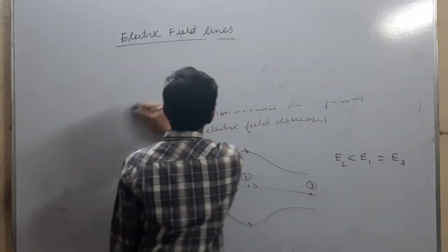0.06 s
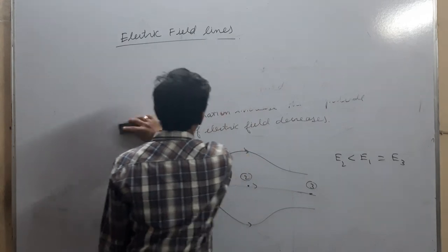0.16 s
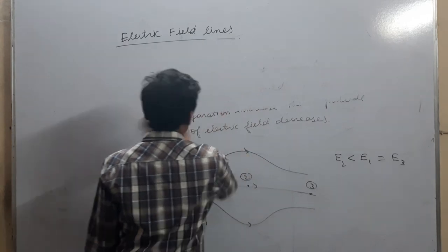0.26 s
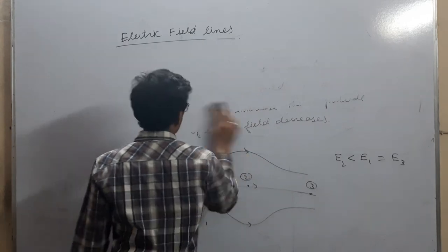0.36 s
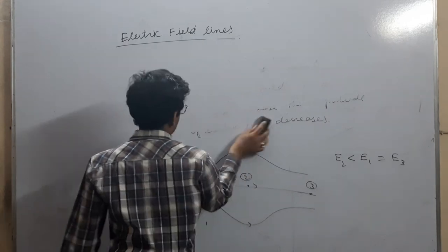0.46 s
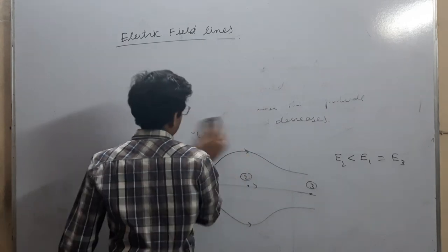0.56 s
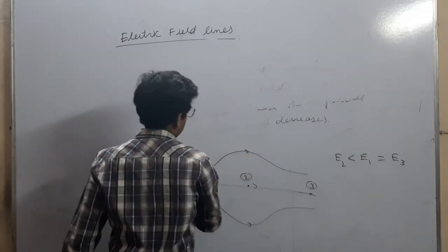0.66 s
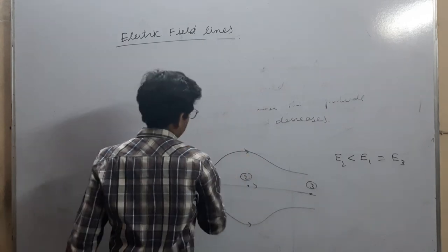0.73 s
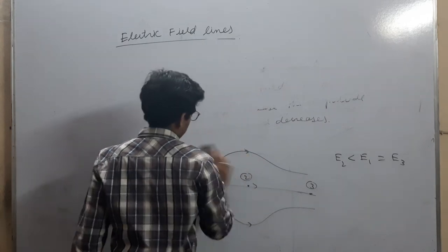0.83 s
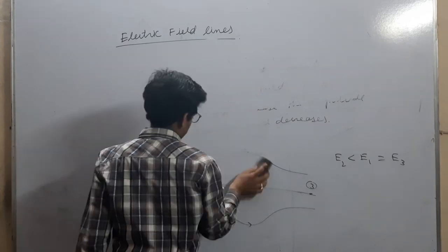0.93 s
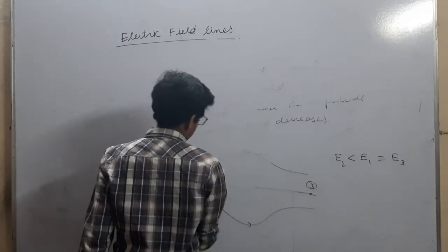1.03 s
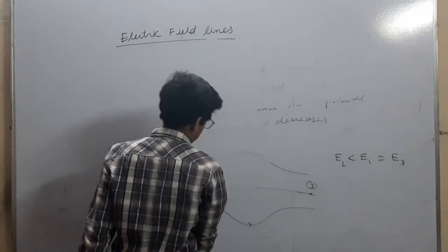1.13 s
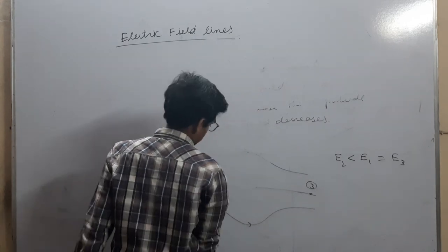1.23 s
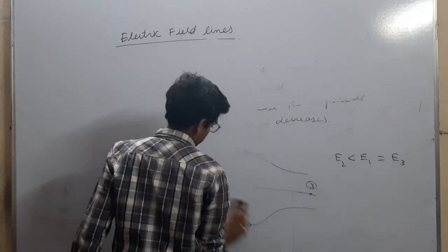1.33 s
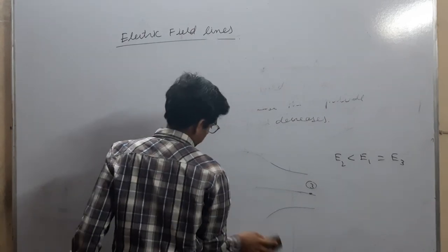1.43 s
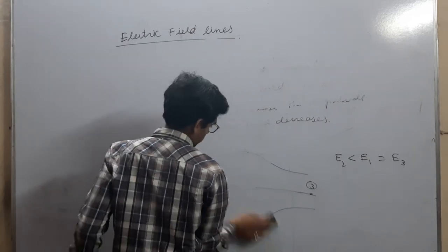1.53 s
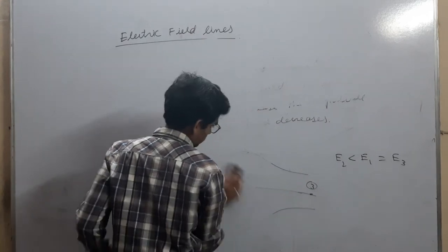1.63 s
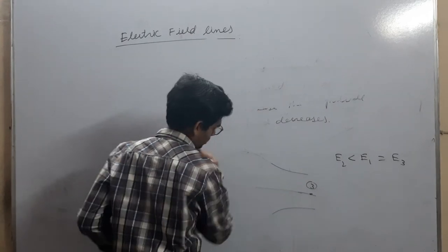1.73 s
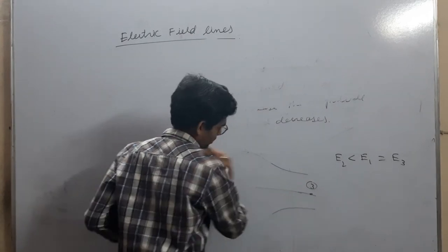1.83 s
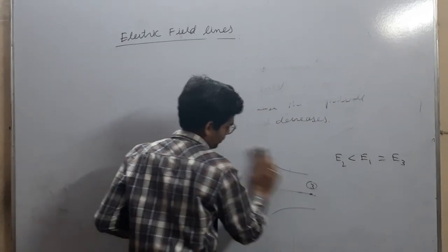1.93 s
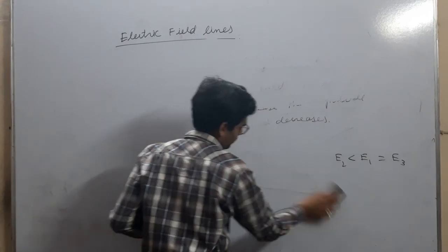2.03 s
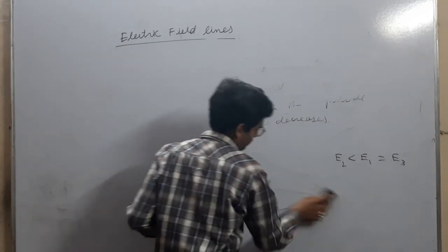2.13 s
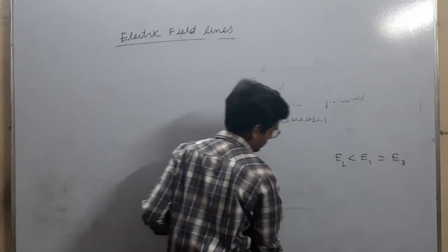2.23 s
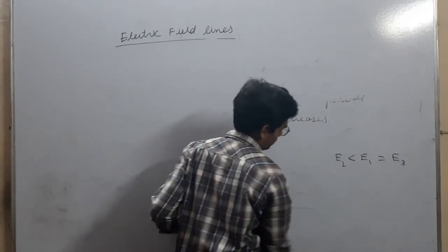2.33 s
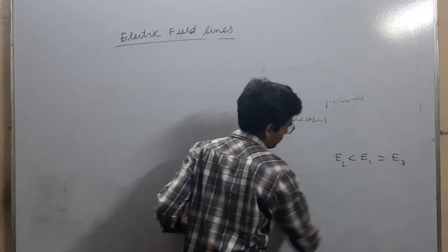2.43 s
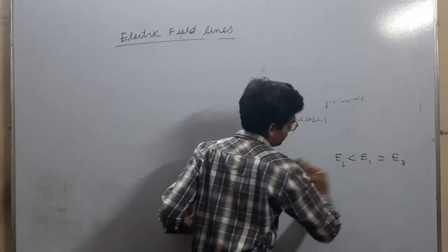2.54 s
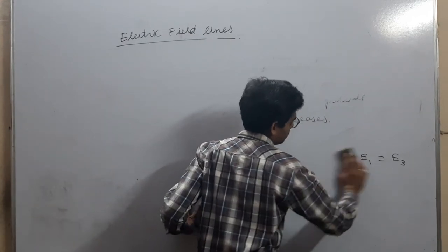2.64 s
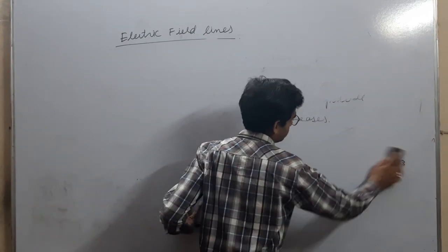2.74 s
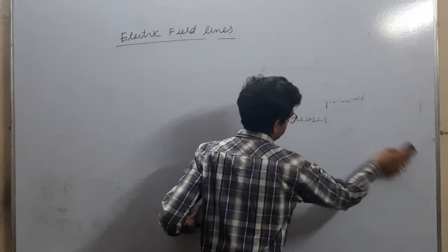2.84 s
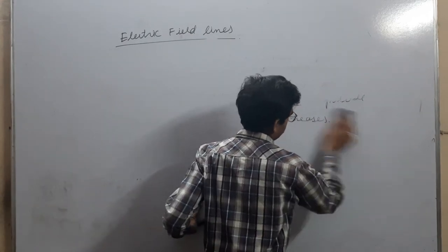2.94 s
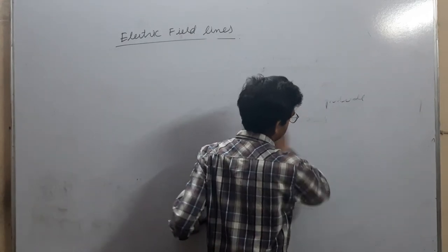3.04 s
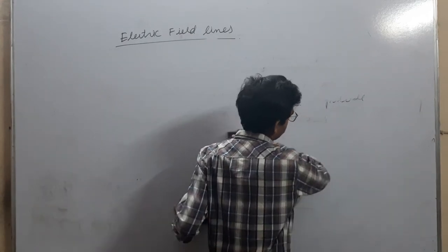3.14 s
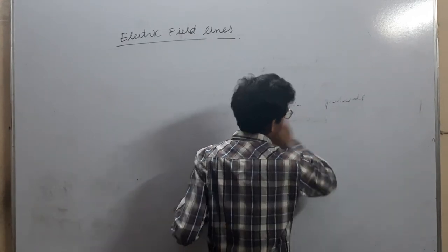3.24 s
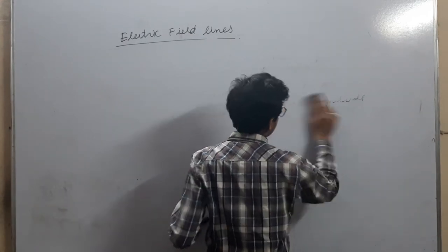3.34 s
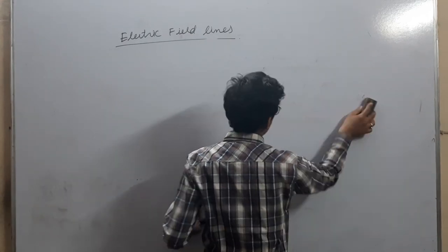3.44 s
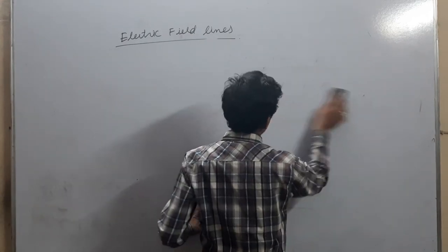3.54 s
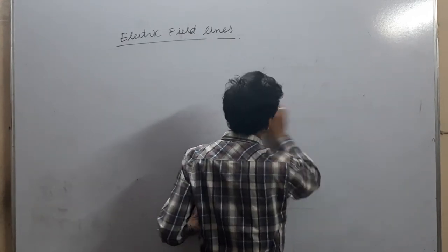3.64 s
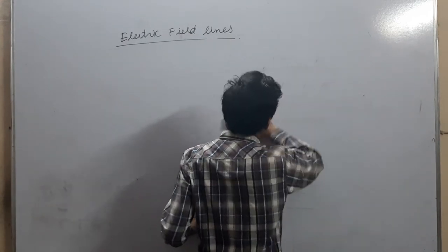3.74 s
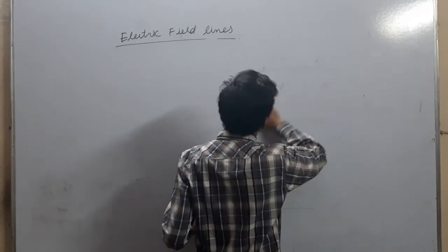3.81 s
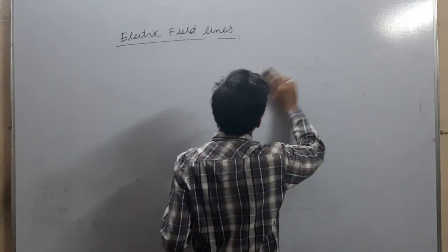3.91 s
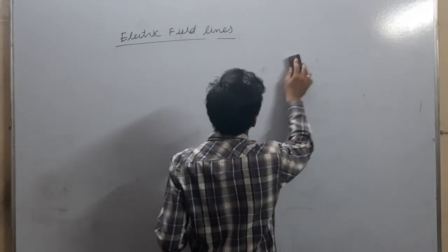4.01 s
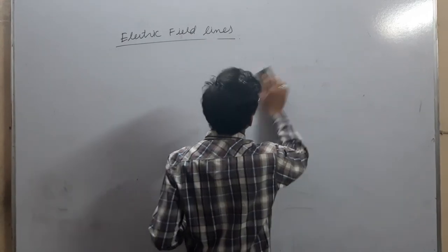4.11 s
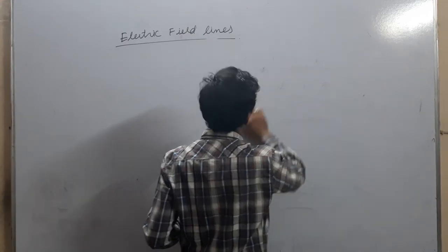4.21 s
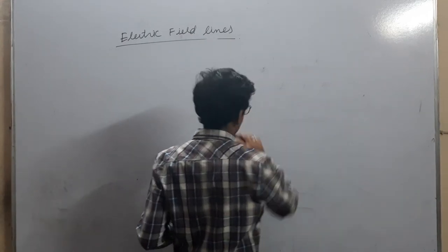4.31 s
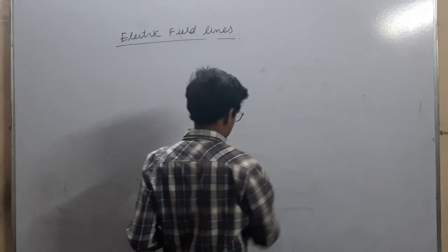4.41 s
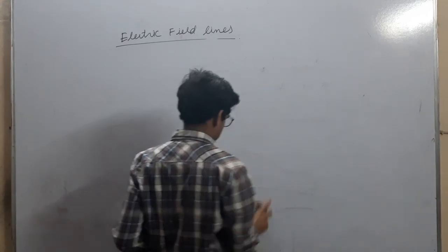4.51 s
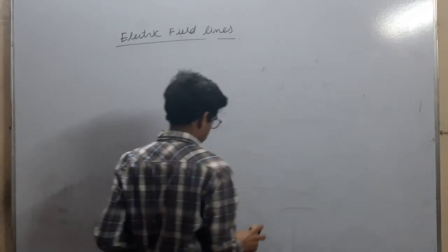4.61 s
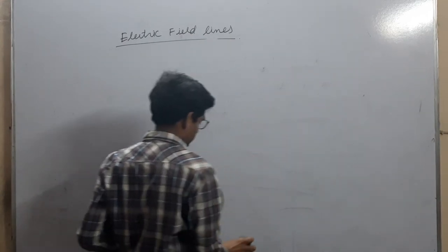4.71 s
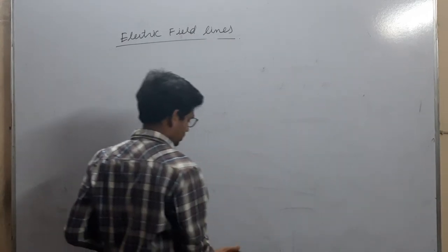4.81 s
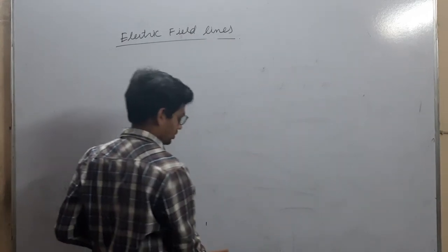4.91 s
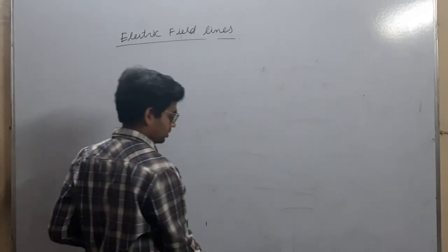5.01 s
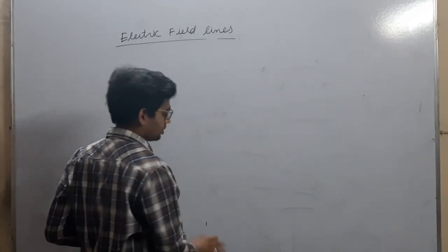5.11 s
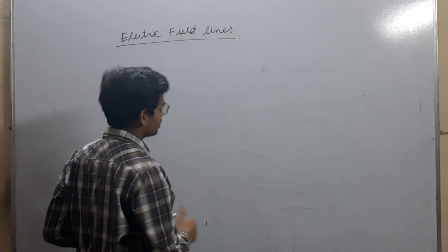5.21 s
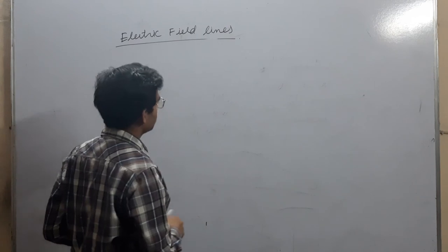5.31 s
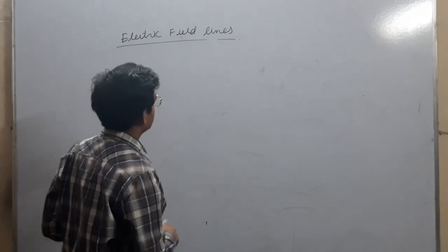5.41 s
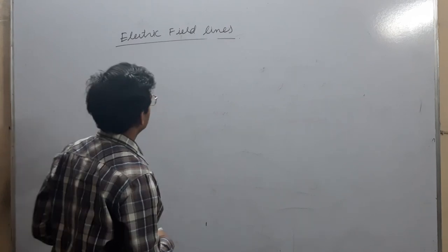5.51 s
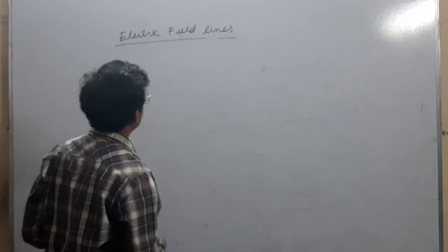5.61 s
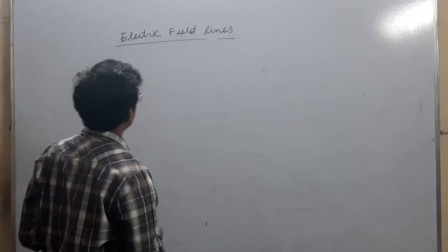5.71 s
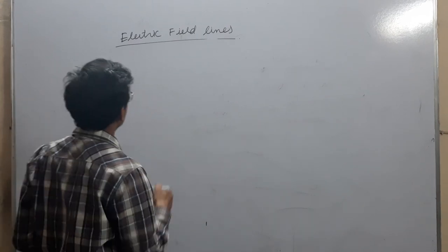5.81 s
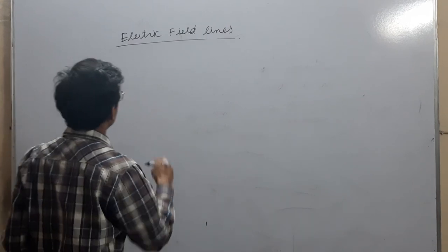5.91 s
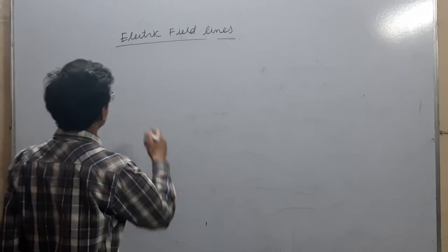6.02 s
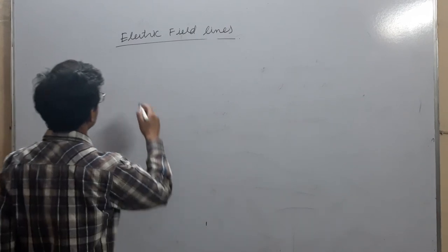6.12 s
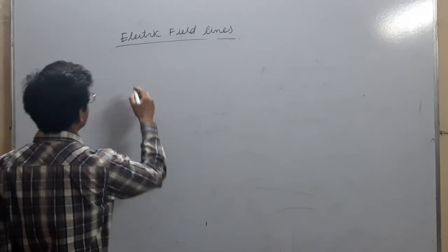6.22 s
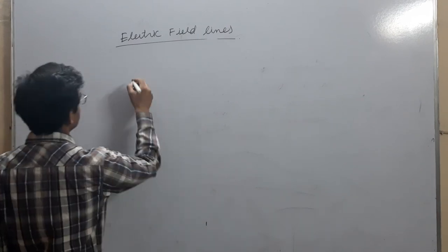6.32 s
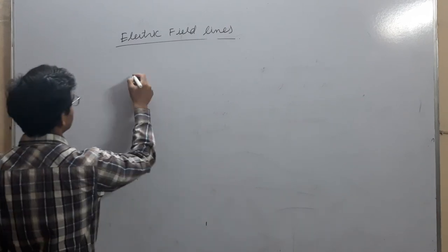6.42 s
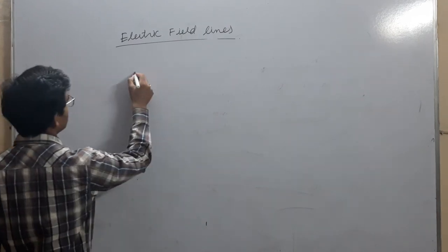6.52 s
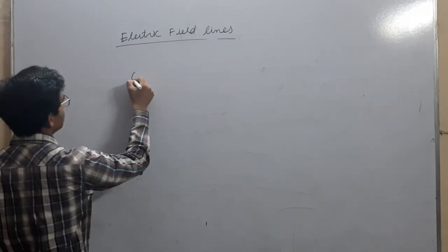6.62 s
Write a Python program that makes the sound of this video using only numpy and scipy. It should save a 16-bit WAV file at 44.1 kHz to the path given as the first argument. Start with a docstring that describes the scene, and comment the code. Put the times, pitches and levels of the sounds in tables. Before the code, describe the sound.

A felt duster swishes across a whiteboard in an echoing classroom, lands with two loud knocks, while an engine putters outside.

```python
"""A felt duster wipes a wall whiteboard in a bare, echoing classroom; the board drums softly under the strokes.
It is put down on the ledge with two loud knocks, a marker is uncapped and starts to write.
Outside, a single-cylinder engine putters along the street and changes gear twice, over a dull wash of traffic.
Shaped noise makes the strokes, blows and street; decaying sines ring the board; summed orders make the engine."""
import sys
import numpy as np
from scipy import signal
from scipy.io import wavfile

SR = 44100
rng = np.random.default_rng(int(sys.argv[2]) if len(sys.argv) > 2 else 0)


def file_out(sig):
    """Save sig as 16-bit WAV at sys.argv[1]."""
    # one column per channel
    cols = np.atleast_2d(sig).T
    # limit, then scale
    lim = np.clip(cols, -1, 1)
    pcm = np.round(lim * 32767).astype(np.int16)
    wavfile.write(sys.argv[1], SR, pcm)


N = 293381
TIME = np.arange(N) / SR

# analysis bands that build every diffuse sound
EDGES = np.geomspace(28, 17000, 34)
CENTRES = np.sqrt(EDGES[1:] * EDGES[:-1])
BANK = [signal.butter(2, pair, "band", fs=SR, output="sos") for pair in zip(EDGES, EDGES[1:])]

# left-right likeness of the room's sound: [f/Hz, correlation]
ROOM_LIKENESS = [(130, 0.77), (220, 0.89), (400, 0.7), (700, 0.31), (1250, -0.26), (2000, 0.1),
                 (4400, 0.0055)]
# spectrum of a hard edge scraping the board: [f/Hz, level per Hz/dB]
SCRAPE_SPECTRUM = [(300, -8), (1000, -9), (1700, -2), (2400, 0), (3900, -3), (5500, -14), (15000, -40)]

# a stroke follows the hand's speed: each layer grows as a power of it, then hangs in the air (t60 in s)
SCRAPE_POWER, SCRAPE_HANG_S = 1.8, 1
DRUM_POWER, DRUM_HANG_S = 0.69, 1


def from_db(db):
    """Level in dB to a gain."""
    return 10 ** (np.asarray(db) / 20)


def rms_one(x):
    """Scales a sound to rms 1."""
    return x / np.sqrt(np.mean(x ** 2) + 1e-20)


def curve(points):
    """Draws a curve of time and value as straight lines, at every sample."""
    times, values = np.transpose(points)
    return np.interp(TIME, times, values)


def at_hz(points, hz):
    """Reads a curve over frequency, straight between its points on a log frequency scale."""
    freqs, values = np.transpose(points)
    return np.interp(np.log(hz), np.log(freqs), values)


def bands(spectrum, size=N):
    """Yields (Hz, stereo noise) for each band of a diffuse sound; the bands together have about rms 1."""
    gains = from_db(at_hz(spectrum, CENTRES))
    gains = gains / np.sqrt(np.sum(gains ** 2 * np.diff(EDGES)) * 2 / SR)
    # two noise pairs alternate between bands; the extra tenth of a second lets the filters settle
    white = rng.standard_normal((2, 2, size + SR // 10))
    for k, hz in enumerate(CENTRES):
        mid, side = signal.sosfilt(BANK[k], white[k % 2])[:, -size:]
        alike = np.clip(at_hz(ROOM_LIKENESS, hz), -.99, .99)
        shared = np.sqrt((1 + alike) / 2) * mid
        opposed = np.sqrt((1 - alike) / 2) * side * [[1], [-1]]
        # the right side is a little brighter
        balance = from_db(np.array([[-1], [1]]) * 1.6 * (hz / 15000) ** 2)
        yield hz, gains[k] * balance * (shared + opposed)


def noise(spectrum):
    """Steady stereo noise with the given spectrum."""
    return sum(band for hz, band in bands(spectrum))


def flutter(per_s, depth_db, size=N):
    """A gain that wanders at random between per_s new values a second."""
    knots = rng.standard_normal(size // 200)
    return from_db(depth_db * np.interp(TIME[:size] * per_s, np.arange(len(knots)), knots))


def add(out, s, sound):
    """Mixes a sound in from time s."""
    start = round(s * SR)
    out[:, start:start + sound.shape[-1]] += sound[..., :N - start]


def blow(spectrum, crack, crack_s, ring=1):
    """A short direct crack, then an uneven room tail that dies at its own rate in each band."""
    # reverberation time, scaled by ring: [f/Hz, t60/s]
    decay = [(100, 2.05), (250, 1.54), (700, 1.47), (2000, 1.167), (4000, 0.98), (8000, 0.86),
             (15000, 0.11)]
    t = TIME[:round(1.3 * SR)]
    direct = crack * np.exp(-t / crack_s)
    contact = 1 - np.exp(-t / .0008)   # softens the very first instant
    out = 0
    for hz, band in bands(spectrum, size=len(t)):
        fade = from_db(-60 * t / (ring * at_hz(decay, hz)))
        tail = flutter(per_s=25.1, depth_db=1.5, size=len(t)) * fade
        out = out + band * (tail + direct * hz / (hz + 1500))   # the crack favours the treble
    return contact * out


def stroke(mid_s, length_s, power, hang_s):
    """The hand speeds up and slows down in half a sine; the sound follows, then dies away in the room."""
    speed = np.cos(np.pi * np.clip((TIME - mid_s) / length_s, -.5, .5))
    db = 20 * power * np.log10(speed + 1e-9)
    # the level may never drop faster than the room lets it
    fall = 60 * TIME / hang_s
    return from_db(np.maximum.accumulate(db + fall) - fall)


def strokes(mids, lengths, dbs, power, hang_s):
    """The gain of a run of strokes, whose powers add."""
    total = 0
    for mid_s, length_s, db in zip(mids, lengths, dbs):
        total = total + (from_db(db) * stroke(mid_s, length_s, power, hang_s)) ** 2
    return np.sqrt(total)


def resonate(x, modes):
    """Two-pole resonances in parallel, each with its own gain at the peak."""
    out = 0
    for hz, db, t60 in modes:
        r = from_db(-60 / (t60 * SR))   # pole radius: loss per sample
        poles = [1, -2 * r * np.cos(2 * np.pi * hz / SR), r * r]
        ringing = signal.lfilter([1, 0, -1], poles, x + 1e-18)
        out = out + from_db(db) * (1 - r * r) / 2 * ringing
    return out


def reflected(x, count=6):
    """Echoes off nearby surfaces put a fine ripple on the spectrum."""
    lags = (rng.uniform(.001, .014, count) * SR).astype(int)
    echoes = sum(np.pad(x, ((0, 0), (lag, 0)))[:, :N] for lag in lags)
    return .93 * x + .15 * echoes


def street():
    """A dull wash of far traffic, cut off above 900 Hz, with a thin hiss laid over it."""
    # level of the wash, then of the hiss: [t/s, level/dB]
    wash_level = [(0, -41.5), (1.6, -44), (2.4, -39.5), (4, -41), (4.5, -37), (6.66, -38)]
    hiss_level = [(0, -63), (1.6, -64), (2.6, -56), (6.66, -53)]
    # their spectra: [f/Hz, level per Hz/dB]
    traffic_spectrum = [(30, -36), (55, -16), (120, -2), (200, 1.5), (400, -7), (830, -4)]
    hiss_spectrum = [(700, -15), (1000, 1), (2300, -6), (15500, -37.5)]
    dull = signal.cheby1(8, 1, 900, fs=SR, output="sos")
    wash = signal.sosfilt(dull, noise(traffic_spectrum))
    return from_db(curve(wash_level)) * wash + from_db(curve(hiss_level)) * noise(hiss_spectrum)


def engine(waver_db=2.0, smear_hz=150, count=42):
    """Orders of the firing rate add up to soft putts, and the room booms where an order meets a resonance."""
    # engine speed, with gear changes at 2 s and 3.6 s: [t/s, firing rate/Hz]
    firing = [(0, 27.9), (.6, 28.6), (1.3, 28.5), (1.8, 29.4), (2.0, 25.9), (2.3, 26.4), (2.6, 27.5),
              (2.9, 28.7), (3.3, 29.9), (3.58, 30.6), (3.64, 28.8), (3.73, 28.4), (3.82, 23.2), (4.4, 23.5),
              (5.5, 24.4), (6.66, 25.3)]
    # exhaust through the walls, the level of an order by its pitch: [f/Hz, level/dB]
    exhaust = [(52, -21), (90, -17), (125, -13.5), (215, -11), (270, -16), (300, -25), (360, -18),
               (440, -42), (510, -23), (680, -44), (810, -21.5), (950, -48), (1110, -27.5), (1230, -49)]
    # swell of the two lowest orders, then loudness of the whole engine: [t/s, level/dB]
    bass_swell = [(0, 3), (1.2, 3), (2.1, -8), (2.6, 7.5), (3.2, -2), (4, 8), (4.7, -6), (6.66, -8)]
    loudness = [(0, -55), (.25, -50), (.5, -55), (.95, -57), (1.35, -50), (1.7, -50.5), (2.05, -52.5),
                (2.6, -44.5), (2.88, -39), (3.15, -40.5), (3.4, -38.5), (3.7, -41.5), (4.02, -51),
                (4.35, -43.5), (4.7, -36.5), (5.4, -43.5), (5.75, -43), (6.2, -45), (6.55, -38)]
    # room resonances that boom and ring on: [f/Hz, level/dB]
    booms = [(143, 13), (173, 6), (181, 12), (192, 11.5), (214, 10.5), (244, 5.5), (275, -0.5)]
    boom_t60_s = 0.62
    per_s = curve(firing)
    firings = np.cumsum(per_s) / SR
    swell_db = curve(bass_swell)
    putts = 0
    for order in range(2, count):
        hz = order * per_s
        db = at_hz(exhaust, hz) + swell_db * (order <= 3)
        # echoes smear the putts: the phases scatter more in the higher orders
        smear = hz[0] / smear_hz * rng.standard_normal()
        tone = np.sin(2 * np.pi * order * firings + smear)
        putts = putts + from_db(db) * flutter(per_s=7.3, depth_db=waver_db) * tone
    heard = from_db(curve(loudness)) * putts
    return heard + resonate(heard, [(hz, db, boom_t60_s) for hz, db in booms])


def marker():
    """A sleeve brushes past, the cap snaps off, the felt tip slides smoothly on the board as steady noise."""
    # sleeve brushes: [t at mid-stroke/s, length/s, level/dB]
    brushes = [(4.805, 0.17, -54), (4.99, 0.14, -53), (5.19, 0.2, -42.5), (5.59, 0.15, -57),
               (6.074, 0.088, -57.5)]
    # spectrum of sleeve and tip, then of the cap: [f/Hz, level per Hz/dB]
    slide_spectrum = [(700, 3.5), (2400, 5), (4000, 1.5), (7800, 1), (9200, -3.5), (12800, -3.5),
                      (15500, -13)]
    cap_spectrum = [(500, 0), (2000, 8), (8200, 4), (9500, -11), (15500, -8)]
    cap_s, cap_db = 5.713, -49.5
    write_s, write_attack_s, write_db = 6.505, 0.05, -47.5
    sleeve = strokes(*np.transpose(brushes), power=1.1, hang_s=0.49)
    tip = from_db(write_db) * np.clip((TIME - write_s) / write_attack_s, 0, 1)
    out = (sleeve + tip) * noise(slide_spectrum)
    add(out, cap_s, from_db(cap_db) * blow(cap_spectrum, crack=0.38, crack_s=0.0057, ring=0.63))
    return out


def board_ring(swell_s=0.027):
    """The panel's modes build up after a blow and die away, each reaching the two sides out of step."""
    # board modes: [f/Hz, level/dB, t60/s]
    board_modes = [(214.5, 3, .8), (238, -8, 1.1), (247, -8, 1.0), (375, -10, 1.4), (497, -10, 1.0),
                   (556, -9, 1.1), (702, -12, 1.4), (834, -10, 1.1), (1108, -13, .9), (1617, -18, 1.0),
                   (1705, -18, 1.1), (1848, -18, 1.0), (2031, -19, .9)]
    t, out = TIME[:2 * SR], 0
    for hz, db, t60 in board_modes:
        # phase offset that gives each mode the room's left-right likeness
        alike = np.clip(at_hz(ROOM_LIKENESS, hz), -1, 1)
        apart = np.arccos(alike) / 2 * rng.choice([-1, 1])
        scatter = rng.standard_normal() * hz / 500
        phase = 2 * np.pi * hz * t + scatter + apart * np.array([[1], [-1]])
        out = out + from_db(db - 60 * t / t60) * np.sin(phase)
    return out * (1 - np.exp(-t / swell_s))


def knocks():
    """The duster lands on its padded side, then its hard back tips onto the ledge; both blows ring the board."""
    # contacts with the ledge: [t/s, dull body level/dB, hard edge level/dB, board ring level/dB]
    contacts = [(4.821, -18.5, -32, -20), (5.008, -24, -15.5, -14.5)]
    # spectra of the dull body and the hard edge: [f/Hz, level per Hz/dB]
    body_spectrum = [(30, -46), (60, -21), (120, -10), (220, 0.5), (400, -10.5), (600, -1.5), (1000, -10),
                     (1700, -23), (3000, -25), (7500, -38), (9500, -50), (15500, -41)]
    edge_spectrum = [(60, -64), (200, 5.5), (550, 2.5), (850, 3.5), (1250, 1), (1850, 1.5), (2600, -6.5),
                     (3800, -15), (5200, -30), (8000, -30.5), (9500, -42), (15500, -42)]
    clack_db = -6.5   # first hard contact, against the edge's level
    knock_low_cut_hz = 107   # low cut that keeps the knocks free of deep thump
    out = np.zeros((2, N))
    for s, body_db, edge_db, ring_db in contacts:
        add(out, s, from_db(body_db) * blow(body_spectrum, crack=0.75, crack_s=0.021, ring=0.97))
        add(out, s, from_db(edge_db) * blow(edge_spectrum, crack=1.53, crack_s=0.02, ring=1.0))
        add(out, s, from_db(ring_db) * board_ring())
        clack = blow(SCRAPE_SPECTRUM, crack=2.0, crack_s=0.0028, ring=0.03)
        add(out, s, from_db(edge_db + clack_db) * clack)
    return signal.sosfilt(signal.butter(3, knock_low_cut_hz, "high", fs=SR, output="sos"), out)


def judder():
    """The dragging pad sticks and slips; each slip rings the duster's hollow back."""
    # juddering strokes: [t at mid-stroke/s, length/s, level/dB]
    drags = [(1.12, 0.11, -52), (2.064, 0.26, -50.5), (2.29, 0.22, -49), (2.6, .24, -47)]
    # modes of the duster's back: [f/Hz, level/dB, t60/s]
    back_modes = [(310, 6.5, 0.19), (342, 7.5, 0.12), (567, -14, 0.046)]
    slips_per_s = 120   # on average, at random moments
    slips = (rng.random(N) < slips_per_s / SR) * rng.standard_normal(N)
    ringing = rms_one(resonate(slips, back_modes))
    return strokes(*np.transpose(drags), DRUM_POWER, DRUM_HANG_S) * ringing


def rasps():
    """A hard-pressed stroke rasps in one band of noise, pitched by the grip."""
    # hard-pressed strokes: [t at mid-stroke/s, length/s, f/Hz, level/dB]
    presses = [(.45, 0.26, 3500, -53.5), (0.51, 0.24, 1580, -54.5), (1.845, 0.23, 2380, -52)]
    spread = 1.31   # ratio of band edge to centre
    out = 0
    for s, length, hz, db in presses:
        band = signal.butter(2, [hz / spread, hz * spread], "band", fs=SR, output="sos")
        grain = rms_one(signal.sosfilt(band, rng.standard_normal((2, N))))
        out = out + from_db(db) * stroke(s, length, SCRAPE_POWER, SCRAPE_HANG_S) * grain
    return out


def duster():
    """Felt fibres hiss, the pressed edge scrapes, and uneven friction and landings shake the panel."""
    # strokes: [t at mid-stroke/s, length/s, felt hiss level/dB, edge scrape level/dB, panel drumming level/dB]
    wipes = [(0.052, 0.25, -56.5, -74, -53), (0.458, 0.39, -48.5, -50.5, -52.5),
             (0.63, 0.44, -59.5, -62, -51), (0.895, 0.3, -57.5, -76, -55), (1.129, 0.31, -56, -63.5, -46),
             (1.416, 0.36, -55.5, -65, -45.5), (1.682, 0.29, -57.5, -79, -50.5),
             (1.847, 0.27, -49, -52.5, -49.5), (2.026, 0.37, -52.5, -54, -46.5),
             (2.322, 0.42, -57, -60.5, -44), (2.576, 0.34, -58, -54.5, -45), (2.773, 0.4, -53, -75, -47),
             (3.04, 0.4, -55, -59.5, -45), (3.4, 0.36, -54.5, -57, -43), (3.67, 0.27, -55.5, -63, -47.5),
             (3.967, 0.35, -62.5, -83, -54.5), (4.27, 0.54, -55.5, -57.5, -50.5),
             (4.453, 0.14, -56, -55, -72)]
    # duster landing on the board: [t/s, level/dB]
    bumps = [(.990, -43.5), (1.093, -39.5), (1.134, -40.5), (1.375, -45.5), (2.038, -44), (2.269, -39.5),
             (4.225, -48.5), (4.717, -38.5)]
    # spectra of the felt and the drumming panel: [f/Hz, level per Hz/dB]
    felt_spectrum = [(300, -15), (1000, 2.5), (2500, 0.5), (4300, 4), (7800, 1), (9200, -5), (12800, -3.5),
                     (15500, -11)]
    panel_spectrum = [(30, -32), (130, -8.5), (225, 2.5), (350, -8), (450, -8), (700, -15), (1100, -30.5),
                      (15000, -51.5)]
    scuff_s, scuff_db = 2.8, -57   # the duster's rim catches the board
    s, length, felt_db, scrape_db, drum_db = np.transpose(wipes)
    felt = strokes(s, length, felt_db, power=1.17, hang_s=0.79) * noise(felt_spectrum)
    edge = strokes(s, length, scrape_db, SCRAPE_POWER, SCRAPE_HANG_S) * noise(SCRAPE_SPECTRUM)
    panel = strokes(s, length, drum_db, DRUM_POWER, DRUM_HANG_S) * noise(panel_spectrum)
    panel = panel * flutter(per_s=85, depth_db=1.0)   # uneven friction
    out = reflected(felt + edge + rasps()) + panel + judder()
    add(out, scuff_s, from_db(scuff_db) * blow(SCRAPE_SPECTRUM, crack=0.56, crack_s=0.01, ring=0.64))
    for bump_s, db in bumps:
        add(out, bump_s, from_db(db) * blow(panel_spectrum, crack=2.0, crack_s=0.008, ring=0.59))
    return out


def scene():
    """Street and engine behind, the marker and the knocks, and the duster in front."""
    return street() + engine() + marker() + knocks() + duster()


def record(dry):
    """The microphone sheds the deep bass, the loudest peaks are rounded and the top is cut steeply."""
    low_cut_hz, cutoff_hz = 48, 15800
    heard = signal.sosfilt(signal.butter(4, low_cut_hz, "high", fs=SR, output="sos"), dry)
    rounded = .8 * np.tanh(heard / .8)
    return signal.sosfilt(signal.ellip(10, .2, 80, cutoff_hz, fs=SR, output="sos"), rounded)


dry = scene()
out = record(dry)
file_out(out)
```